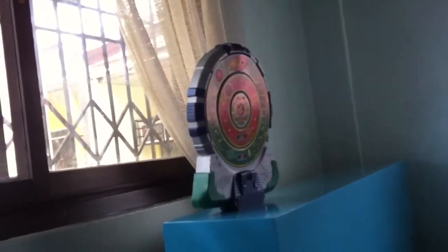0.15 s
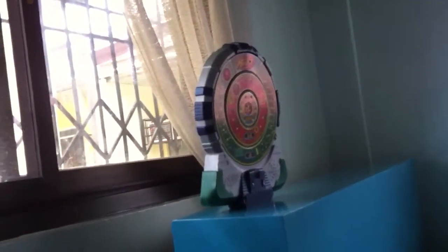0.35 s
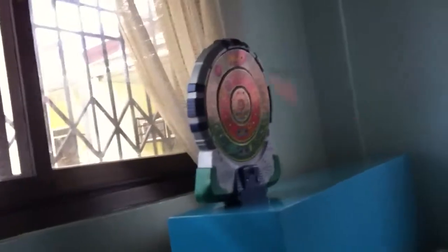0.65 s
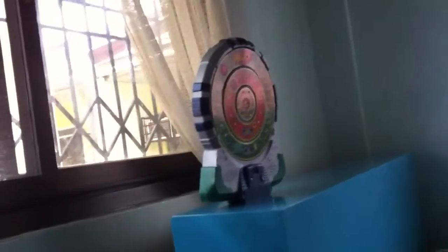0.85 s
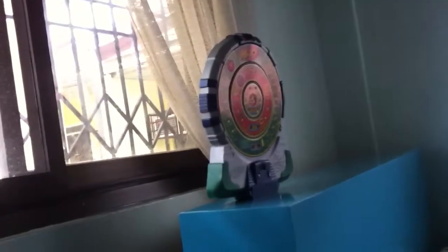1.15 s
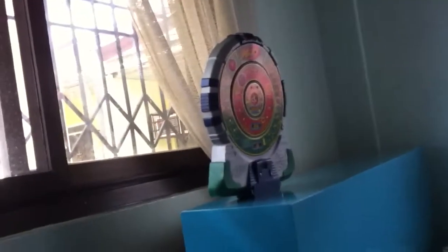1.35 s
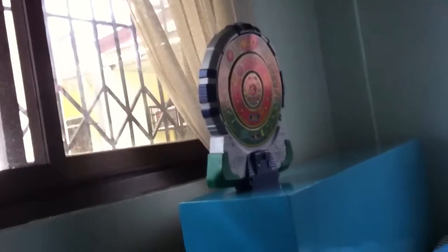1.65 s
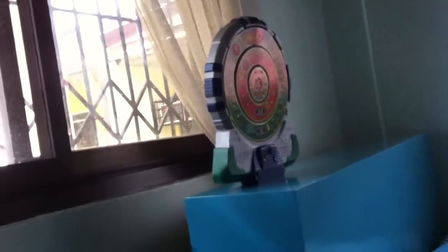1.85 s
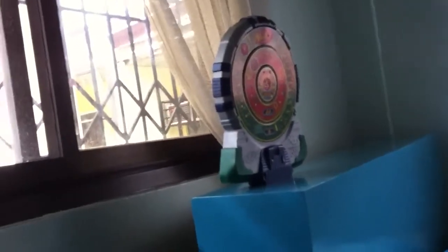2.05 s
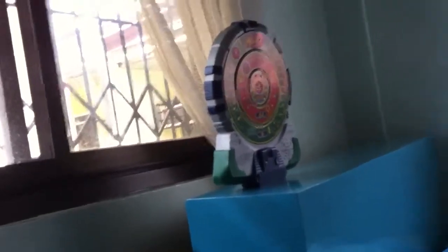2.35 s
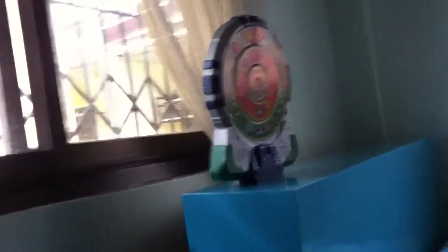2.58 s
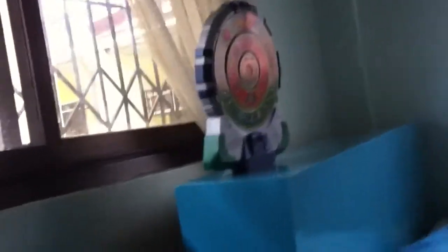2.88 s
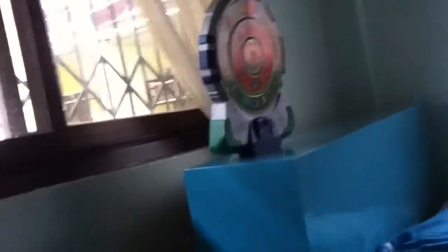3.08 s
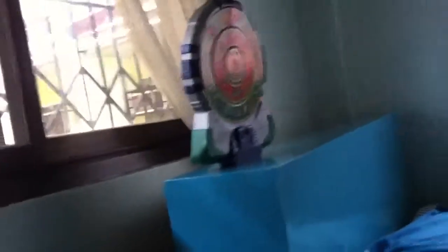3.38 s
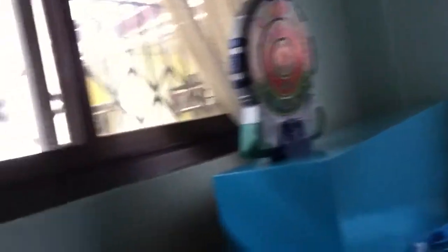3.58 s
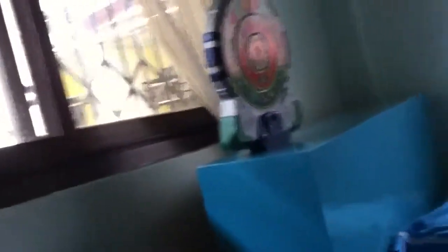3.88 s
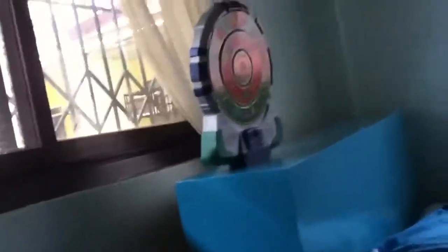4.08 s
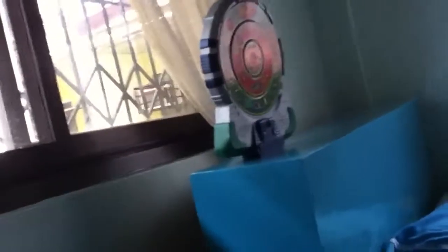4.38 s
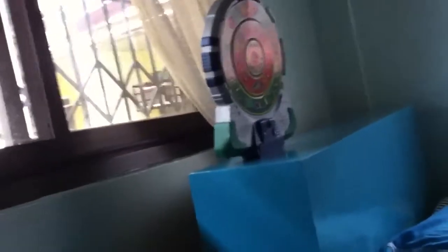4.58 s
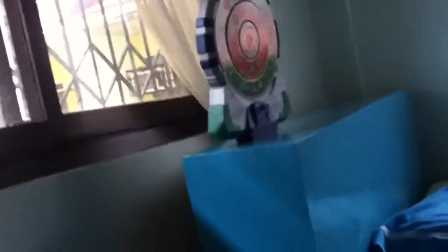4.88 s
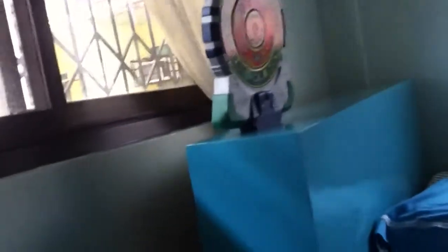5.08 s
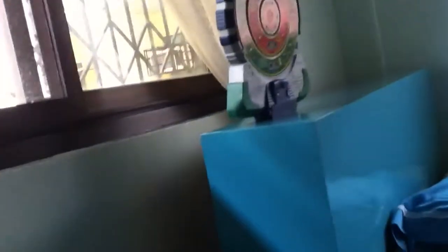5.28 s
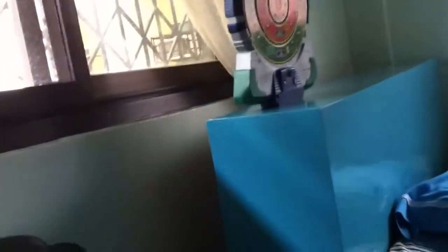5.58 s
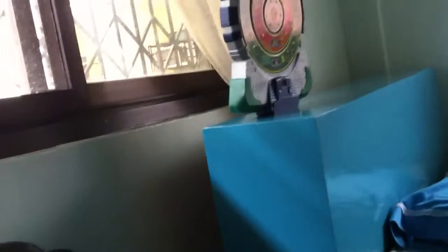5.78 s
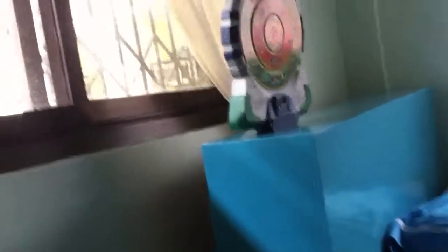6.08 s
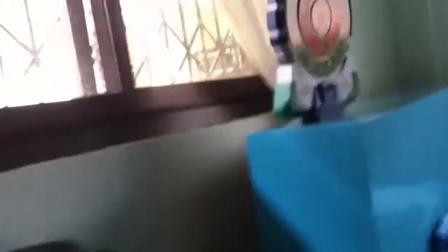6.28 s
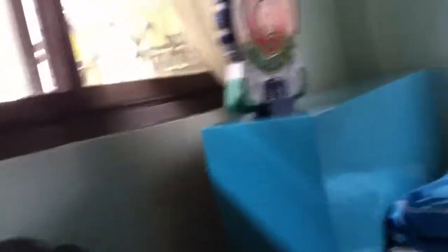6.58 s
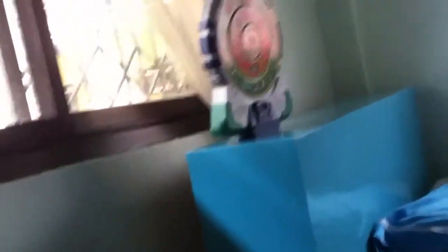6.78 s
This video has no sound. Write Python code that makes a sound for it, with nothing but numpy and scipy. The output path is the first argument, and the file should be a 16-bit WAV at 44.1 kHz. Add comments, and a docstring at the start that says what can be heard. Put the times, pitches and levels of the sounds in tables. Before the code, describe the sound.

A spring-powered plastic dart blaster is fired and cocked three times, close by, in a small room with a short, hard echo. A quiet dull hum runs throughout, and a faint wavering whine from outside comes and goes.

After a trigger tick, the first shot snaps at 0.5 seconds; the foam dart thuds at 0.7 and drops softly at 1.2. The slide scrapes back and latches around 1.7, then knocks home hollowly at 2.1. The second shot cracks at 3.0, with the loudest dart thud at 3.3 and a light drop at 3.8. The slide clacks back at 4.2 and forward at 4.5. The third shot comes at 5.5, its dart thudding at 5.7 with a faint low ring. A last cocking scrapes and clicks at 6.5 and shuts at 6.8. Between these, hands rustle lightly on the grip and loose parts tick and ping faintly.

```python
"""A spring-driven plastic dart blaster, fired and cocked three times in a small, hard-walled room.
A dull hum runs throughout; a faint wavering whine from outside comes and goes. Each round: the trigger
ticks, the plunger slips its catch and slams into the end of its tube. The foam dart thuds on the far
side; the first two are heard to drop. Then the slide scrapes back, latches the spring and is pushed
home, knocking the hollow shell. In between, hands rustle on the grip and loose parts ping faintly."""
import sys
import numpy as np
from scipy import signal
from scipy.fft import rfft, irfft, next_fast_len
from scipy.io import wavfile
from scipy.ndimage import map_coordinates

SR = 44100
rng = np.random.default_rng(int(sys.argv[2]) if len(sys.argv) > 2 else 0)


def transcribe(signal):
    """Save signal, clipped to [-1, 1], as a 16-bit WAV file at the path in sys.argv[1]."""
    frames = np.atleast_2d(signal).T
    limited = np.clip(frames, -1, 1)
    pcm = np.round(limited * 32767).astype(np.int16)
    wavfile.write(sys.argv[1], SR, pcm)


N = 306054


def amp(db):
    return 10 ** (np.asarray(db) / 20)


def unit_rms(x):
    return x / np.sqrt(np.mean(x ** 2) + 1e-20)


def along(points, hz):
    """Interpolate over log frequency."""
    f, v = np.transpose(points)
    return np.interp(np.log(hz + 1), np.log(f + 1), v)


def curve(rows, column=1):
    """Interpolate over time, per sample."""
    rows = np.array(rows)
    return np.interp(np.arange(N) / SR, rows[:, 0], rows[:, column])


def wobble(rate_hz, size=N):
    """Smooth random curve."""
    knots = rng.standard_normal(int(size * rate_hz / SR) + 4)
    return map_coordinates(knots, [np.arange(size) * rate_hz / SR])


def coloured(x, gain_db):
    """Minimum-phase filter of response gain_db(hz)."""
    m = next_fast_len(len(x) + 8192)
    cepstrum = irfft(np.maximum(gain_db(np.fft.rfftfreq(m, 1 / SR)), -100) * np.log(10) / 20, m)
    cepstrum[1:m // 2] *= 2
    cepstrum[m // 2 + 1:] = 0
    return irfft(rfft(x, m) * np.exp(rfft(cepstrum)), m)[:len(x)]


def lift_db(modes, hz):
    """Summed resonance peaks."""
    return sum(db / (1 + (2 * (hz - centre) / width) ** 2) for centre, width, db in modes)


# room decay: f/Hz, t60/s
ROOM_T60 = [(120, 0.56), (320, 0.35), (840, 0.37), (2200, 0.36), (6000, 0.34), (15000, 0.28)]
def room_tail(rise_s):
    """Random wall response, energy 1; each band dies at its own rate."""
    hz, t, bands = signal.stft(rng.standard_normal(SR * 2 // 3), SR, nperseg=256)
    tail = signal.istft(bands * amp(-60 * t / along(ROOM_T60, hz)[:, None]), SR, nperseg=256)[1]
    age = np.arange(len(tail)) / SR
    tail *= 1 - np.exp(-(age / rise_s) ** 2)
    tail *= amp(4 * wobble(800, len(tail)) * np.exp(-age / .05))  # separate early echoes
    return tail / np.linalg.norm(tail)


def contacts(events, spectrum, modes, spiky_db, edge_db):
    """Short uneven rattles, heard directly and smeared by the walls; levels are energies."""
    out, t = np.zeros(N + SR), np.arange(SR // 8) / SR
    for s, room_db, direct_db, deep_db, bass_db, treble_db, rattle_s in events:
        ripple_db = 2.92 * rng.standard_normal(100)  # no two blows alike

        def tone_db(hz):
            return (along(spectrum, hz) + lift_db(modes, hz)
                    + deep_db / (1 + (hz / 280) ** 4)
                    + bass_db / (1 + (hz / 900) ** 4)
                    + treble_db / (1 + (5000 / (hz + 1)) ** 4)
                    - 14 / (1 + (hz / 105) ** 6)  # low cut
                    + np.interp(hz, np.linspace(0, SR / 2, len(ripple_db)), ripple_db))

        swell = t / rattle_s * np.exp(-t / rattle_s)
        rattle = rng.standard_normal(len(t)) * amp(spiky_db * rng.standard_normal(len(t))) * swell
        direct = coloured(rattle, lambda hz: tone_db(hz) + edge_db / (1 + (2500 / (hz + 1)) ** 2))
        room = coloured(room_tail(0.00034 + 3 * rattle_s), tone_db)
        heard = amp(room_db) * room / np.linalg.norm(room)
        heard[:len(t)] += amp(direct_db) * direct / np.linalg.norm(direct)
        out[round(s * SR):][:len(heard)] += heard
    return out[:N]


def voiced(events, direct_db, deep_db, bass_db, treble_db):
    """Contact rows of one kind; direct_db is relative to the room level."""
    return [(s, db, db + direct_db, deep_db, bass_db, treble_db, rattle_s) for s, db, rattle_s in events]


def rings(tones, rise_s):
    """Damped tones, wavering in pitch and level."""
    out, t = np.zeros(N + SR), np.arange(SR // 2) / SR
    for s, hz, db, t60_s in tones:
        phase = 2 * np.pi * np.cumsum(hz * (1 + .035 * wobble(120, len(t)))) / SR
        decay = amp(db - 60 * t / t60_s + 1.3 * wobble(41.6, len(t)))
        out[round(s * SR):][:len(t)] += decay * (1 - np.exp(-t / rise_s)) * np.sin(phase)
    return out[:N]


# hum and hiss: f/Hz, gain/dB
AIR_SPECTRUM = [(15, -67), (25, -40.5), (38, -28), (108, -22.5), (141, -4.5), (212, -5), (309, -11.5),
                (591, -13.5), (796, -16.5), (988, -14.5), (1650, -19), (2760, -19), (6560, -32),
                (14800, -33.5), (16000, -25.5)]
# hum and hiss: t/s, level/dB
AIR_ENVELOPE = [(0, -57.5), (.62, -60), (1.89, -58.5), (3.17, -60), (4.42, -59), (6.94, -60)]
def room_air():
    """Drifting hum below 3 kHz, hiss above."""
    hum = coloured(rng.standard_normal(N),
                   lambda hz: along(AIR_SPECTRUM, hz) - 10 * np.log10(1 + (hz / 3000) ** 4))
    hiss = coloured(rng.standard_normal(N),
                    lambda hz: along(AIR_SPECTRUM, hz) - 10 * np.log10(1 + (3000 / (hz + 1)) ** 4))
    return amp(curve(AIR_ENVELOPE)) * unit_rms(amp(1.5 * wobble(6)) * hum + hiss)


# whine: t/s, f/Hz, level/dB
WHINE_TRACK = [(0, 950, -67), (.5, 1015, -64), (1.3, 997, -76), (2.6, 985, -71), (3.7, 1056, -72),
               (4.5, 977, -100), (5.9, 915, -95), (6.15, 1017, -64), (6.5, 984, -65), (6.94, 980, -78)]
def outside_whine():
    """Fuzzy tone near 1 kHz; comes and goes."""
    phase = 2 * np.pi * np.cumsum(curve(WHINE_TRACK) + 35 * wobble(60)) / SR
    return amp(curve(WHINE_TRACK, column=2) + 1.7 * wobble(30)) * np.sin(phase)


# body, rubbed or cocked: f/Hz, width/Hz, lift/dB
BODY_MODES = [(563, 140, 4.4), (1130, 310, 4.3), (1575, 48, 3.8), (2153, 34, 4), (2910, 31, 1.4),
              (4000, 68, 5.4), (7200, 270, 3.9), (9250, 180, 6.2), (12300, 200, 2.7)]
def rubbing(strokes, spectrum, rise_s, fade_db_per_s, grain_db, room_db):
    """Friction grains under strokes that swell, hold and fade, ringing in body and room."""
    t, pressure = np.arange(N) / SR, np.zeros(N)
    for s, hold_s, db in strokes:
        swell = np.clip((t - s) / rise_s, 0, 1) ** 2
        pressure += swell * amp(db - fade_db_per_s * np.maximum(t - s - rise_s - hold_s, 0))
    grains = unit_rms(rng.standard_normal(N) * amp(grain_db * wobble(300)))
    friction = coloured(grains, lambda hz: along(spectrum, hz) + lift_db(BODY_MODES, hz))
    direct = pressure * unit_rms(friction)
    return direct + amp(room_db) * signal.fftconvolve(direct, room_tail(0.0044))[:N]


# hand shifts: t/s, hold/s, level/dB
GRIP_STROKES = [(.41, 0.027, -71.5), (1.31, 0.066, -61.5), (2.41, .02, -61.5), (2.93, 0.044, -66),
                (5.86, 0.009, -64.5)]
# grip: f/Hz, gain/dB
GRIP_SPECTRUM = [(1200, -18), (2300, -3.5), (2900, 3.5), (3700, -0.5), (5000, -8.5), (9000, -34)]
def grip_rustles():
    """Hands rub the grip."""
    return rubbing(GRIP_STROKES, GRIP_SPECTRUM, rise_s=0.013, fade_db_per_s=117, grain_db=6, room_db=1.5)


# ticks: t/s, room level/dB, bass/dB, treble/dB
TICK_HITS = [(.422, -24, 8, 0), (1.505, -35, 14, 2), (1.59, -37, 1, 9), (2.016, -14, 15.5, 7),
             (2.692, -32.5, 1, -5), (2.775, -29.5, 1, 0), (2.855, -27.5, 1, 6), (2.954, -23, -4, -2),
             (4.471, -20, 13, 0), (5.345, -23.5, -4, 2), (5.883, -32, 1, 21)]
# ticks: f/Hz, gain/dB
TICK_SPECTRUM = [(300, -18.5), (1500, -9), (3000, -2), (6000, -5), (10000, -14.5), (16000, -12.5)]
# shell: f/Hz, width/Hz, lift/dB
SHELL_MODES = [(250, 93, 2), (754, 67, -1), (1150, 130, 3), (2340, 140, 4), (3150, 120, 5), (3500, 50, 6.5),
               (3900, 50, 2), (4500, 74, 3.5), (5900, 60, 5)]
def ticks(rattle_s=0.0031):
    """Trigger, slide release and fingers tap the shell."""
    hits = [(s, db, db - 3.5, 0, bass, treble, rattle_s) for s, db, bass, treble in TICK_HITS]
    return contacts(hits, TICK_SPECTRUM, SHELL_MODES, spiky_db=-3.5, edge_db=3.5)


# plunger contacts: t/s, room level/dB, rattle/s
PLUNGER_SLIPS = [(.5395, -18, 0.0028), (3.036, 4, 0.0013), (5.445, -14, 0.0092)]
PLUNGER_SLAMS = [(.5435, 5.9, 0.00044), (3.041, 10.4, 0.00081), (5.455, 6.6, 0.0012)]
PLUNGER_REBOUNDS = [(.5497, 5.5, 0.000067), (.5555, 2, 0.0004), (.564, 0.5, 0.002), (3.047, -4.5, 0.0047),
                    (3.056, -2, 0.0025), (5.4605, 2, .0017), (5.4655, 4, 0.0018)]
# plunger: f/Hz, gain/dB
PLUNGER_SPECTRUM = [(35, -53), (60, -16), (124, -9), (281, -11.5), (579, -14), (1110, -8), (1200, -4.5),
                    (1620, -9), (2520, 1), (8320, -10.5), (14600, -9.5), (16000, -8)]
def plunger():
    """Slips its catch, hits the tube end, chatters back."""
    hits = (voiced(PLUNGER_SLIPS, direct_db=-1, deep_db=-5, bass_db=-17, treble_db=-2)
            + voiced(PLUNGER_SLAMS, direct_db=-10, deep_db=-5.5, bass_db=13.5, treble_db=6.5)
            + voiced(PLUNGER_REBOUNDS, direct_db=0, deep_db=1, bass_db=1, treble_db=-7.5))
    return contacts(hits, PLUNGER_SPECTRUM, SHELL_MODES, spiky_db=5.5, edge_db=0.5)


# knocks: t/s, f/Hz, level/dB
KNOCK_TONES = [(.543, 750, -31), (2.14, 718, -20.5), (4.529, 773, -23), (5.455, 720, -23),
               (6.848, 756, -25.5)]
def shell_knocks(t60_s=0.035):
    """The hollow shell rings at slams and pushes home."""
    return rings([(*tone, t60_s) for tone in KNOCK_TONES], rise_s=0.00076)


# landings, drops: t/s, room level/dB, direct level/dB, deep/dB, bass/dB, treble/dB, rattle/s
DART_HITS = [(.742, 5.5, 2.5, 1.5, 1, -2.5, 0.0024), (1.203, -17.5, -23.5, 1, -1.5, 5.5, 0.0012),
             (3.2895, 12, 9.5, 6.5, -9, 3, 0.0019), (3.795, -12.5, -13, 5, 4.5, 16, 0.0013),
             (5.6656, 2.5, -1.5, 2, 2, 1, 0.00062)]
# thud: f/Hz, gain/dB
DART_SPECTRUM = [(35, -56), (60, -26.5), (250, -5), (469, 0.5), (767, -4), (946, -2), (1410, -6.5),
                 (1550, -5.5), (2840, -7.5), (7570, -23), (14200, -24), (16000, -18)]
# struck surface, one list per hit: f/Hz, width/Hz, lift/dB
SURFACE_MODES = [
    [(490, 140, 7), (973, 54, 9), (1570, 63, 8.5), (1936, 77, 8.5), (3100, 1500, -6)],
    [(720, 150, 7), (1020, 60, 16)],
    [(448, 48, 8.5), (1070, 190, 2.5), (1560, 200, 11.5), (2250, 86, 6), (2840, 210, 6.5)],
    [(630, 320, 10.5), (2200, 760, 2)],
    [(245, 42, 7), (515, 153, 13), (685, 58, 11), (1050, 290, -5.5), (1777, 51, 8), (3320, 160, 7)],
]
def dart_thuds():
    """Foam darts land and drop, exciting each surface they meet."""
    return sum(contacts([hit], DART_SPECTRUM, modes, spiky_db=6, edge_db=0.5)
               for hit, modes in zip(DART_HITS, SURFACE_MODES))


# booms: t/s, f/Hz, level/dB
PANEL_TONES = [(.781, 148.5, -38), (5.675, 254.5, -37.5), (5.69, 149.8, -43.5)]
def panel_booms(t60_s=.5):
    """Panels ring after a dart lands."""
    return rings([(*tone, t60_s) for tone in PANEL_TONES], rise_s=.03)


# pings: t/s, f/Hz, level/dB, t60/s
PING_TONES = [(1.505, 815, -46, 0.08), (1.915, 1170, -43.5, .4), (1.972, 3360, -39, 0.082),
              (2.052, 960, -36.5, 0.15), (2.052, 603, -45.5, 0.21), (2.429, 2324, -54.5, .32),
              (2.43, 2680, -53, 0.35), (4.42, 946, -40.5, 0.14), (4.425, 1660, -44, 0.11),
              (4.465, 1236, -40, 0.11), (5.884, 2940, -47, 0.15)]
def spring_pings():
    """Springs and loose parts ring faintly."""
    return rings(PING_TONES, rise_s=0.01)


# slide strokes: t/s, hold/s, level/dB
RAIL_STROKES = [(1.66, 0.16, -46.5), (1.89, 0.055, -57), (2.02, 0.02, -51.5), (4.17, .01, -43.5),
                (4.21, 0.035, -41.5), (4.46, 0.065, -49), (6.485, .01, -43.5), (6.54, 0.14, -47),
                (6.79, .02, -56.5)]
# rails: f/Hz, gain/dB
RAIL_SPECTRUM = [(300, -16), (600, -3), (1200, -1.5), (3000, 0.5), (6000, -10.5), (12000, -13.5),
                 (16000, -7)]
def rail_scrapes():
    """The slide rubs its rails, back then forward."""
    return rubbing(RAIL_STROKES, RAIL_SPECTRUM, rise_s=0.044, fade_db_per_s=119, grain_db=-4, room_db=-6)


# pull contacts: t/s, room level/dB, rattle/s
PULL_STARTS = [(1.674, -.5, 0.0031), (4.208, -3, 0.003), (6.525, 1, 0.0039)]
PULL_JOLTS = [(1.7435, -17, .0012), (4.199, -17, 0.007), (4.222, -15, 0.0028), (6.6, -12, 0.0024)]
PULL_LATCHES = [(1.773, 3.54, 0.0028), (4.265, 1.4, 0.0038), (4.278, 4.1, 0.0021), (6.593, 3.2, 0.0026)]
# pull: f/Hz, gain/dB
PULL_SPECTRUM = [(35, -46), (60, -16), (408, -16), (527, -7), (1660, -6.5), (1780, -7.5), (2090, -2),
                 (2470, -3.5), (3940, -1), (7940, -6.5), (12700, -5), (16000, -6.5)]
def slide_back():
    """The slide leaves its rest and bumps along the rails; the spring catches."""
    hits = (voiced(PULL_STARTS, direct_db=-5, deep_db=-13, bass_db=4, treble_db=-7.5)
            + voiced(PULL_JOLTS, direct_db=5, deep_db=-3, bass_db=3, treble_db=2)
            + voiced(PULL_LATCHES, direct_db=-3.5, deep_db=3.5, bass_db=-14, treble_db=2))
    return contacts(hits, PULL_SPECTRUM, BODY_MODES, spiky_db=3, edge_db=-3)


# stop contacts: t/s, room level/dB, rattle/s
STOP_HITS = [(2.141, 3.5, 0.003), (2.148, 2.5, 0.0017), (4.53, 0.5, 0.0023), (4.536, 2.5, 0.0029),
             (6.848, 0.5, 0.0031), (6.858, -5, 0.0043)]
# stop: f/Hz, gain/dB
STOP_SPECTRUM = [(35, -41), (60, -35.5), (330, -20.5), (398, -11), (469, -20.5), (607, -8.5), (924, -3),
                 (1410, -3.5), (2900, -1), (7940, -11.5), (14600, -14), (16000, -11)]
# stop: f/Hz, width/Hz, lift/dB
STOP_MODES = [(635, 58, 4), (976, 55, 3.3), (1190, 160, 3.7), (1530, 42, 1.8), (2320, 28, 2.4),
              (2930, 110, 1.2), (3050, 48, 1.8), (3960, 330, 3.4)]
def slide_home():
    """The slide strikes its stop."""
    hits = voiced(STOP_HITS, direct_db=-3, deep_db=4.5, bass_db=3.5, treble_db=1)
    return contacts(hits, STOP_SPECTRUM, STOP_MODES, spiky_db=5.5, edge_db=0)


def scene():
    """Mono mix."""
    impacts = plunger() + ticks() + slide_back() + slide_home() + dart_thuds()
    friction = rail_scrapes() + grip_rustles()
    ringing = panel_booms() + shell_knocks() + spring_pings()
    return (impacts + friction + ringing + room_air() + outside_whine())[None]


def record(dry, cutoff_hz=15850):
    """Low-pass, 300 Hz transition."""
    m = next_fast_len(N + 4096)
    slope = np.clip((cutoff_hz + 150 - np.fft.rfftfreq(m, 1 / SR)) / 300, 0, 1)
    return irfft(rfft(dry, m) * np.sin(slope * np.pi / 2) ** 2, m)[:, :N]


dry = scene()
out = record(dry)
transcribe(out)
```